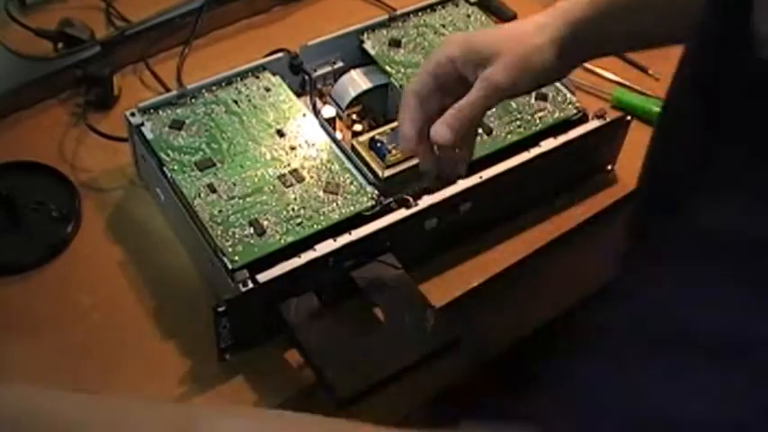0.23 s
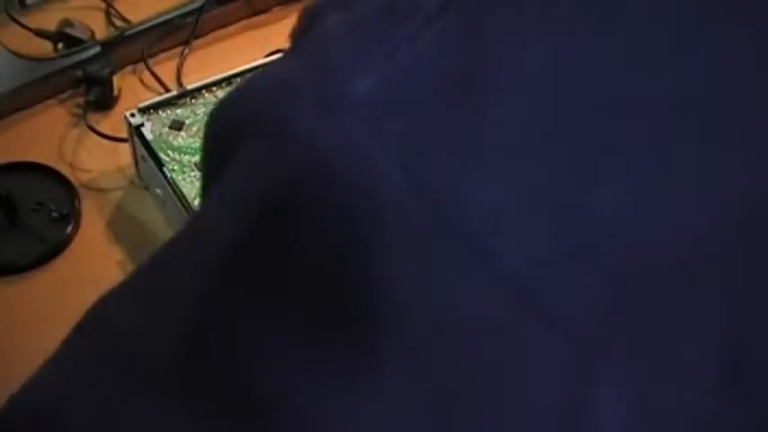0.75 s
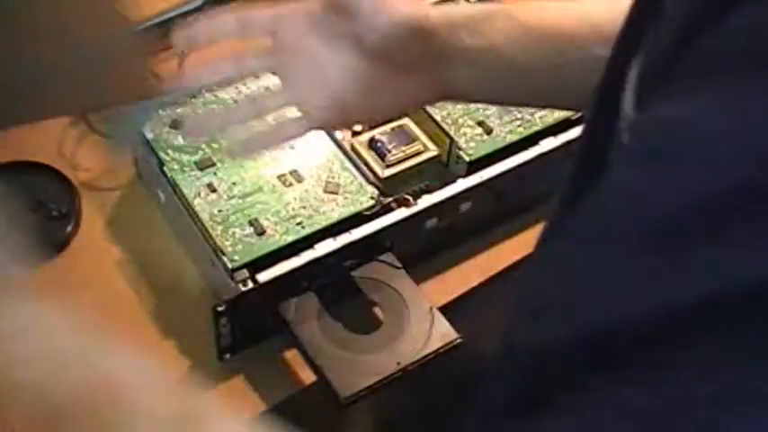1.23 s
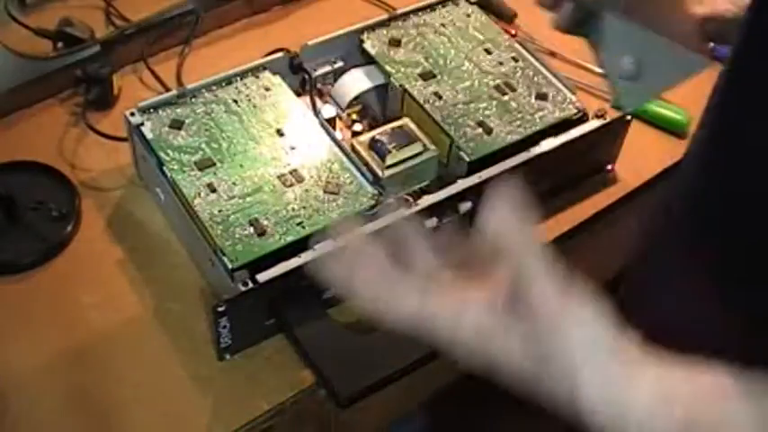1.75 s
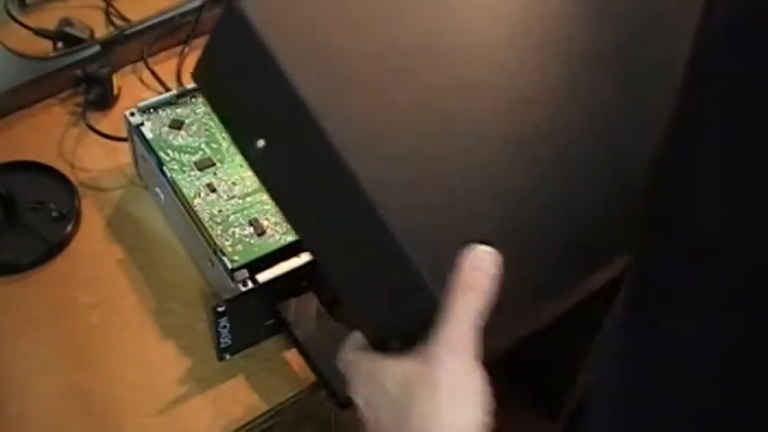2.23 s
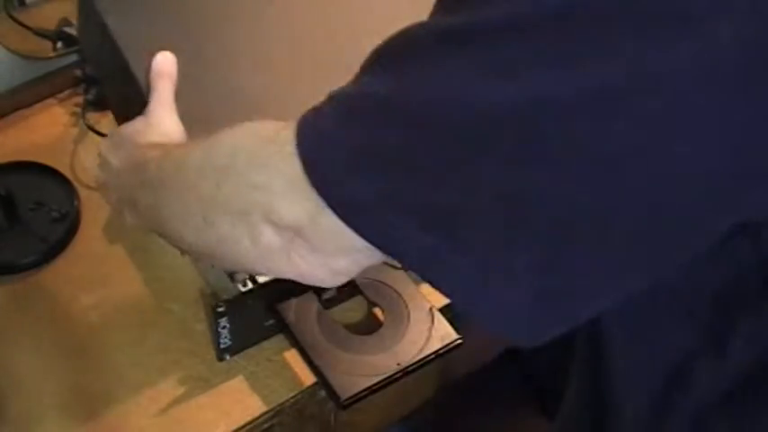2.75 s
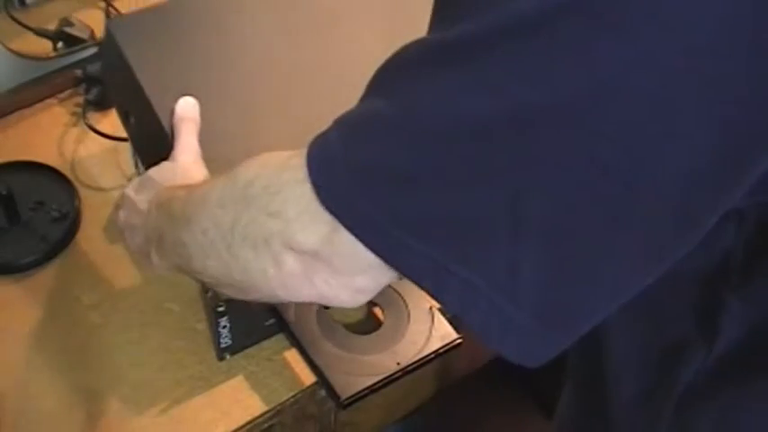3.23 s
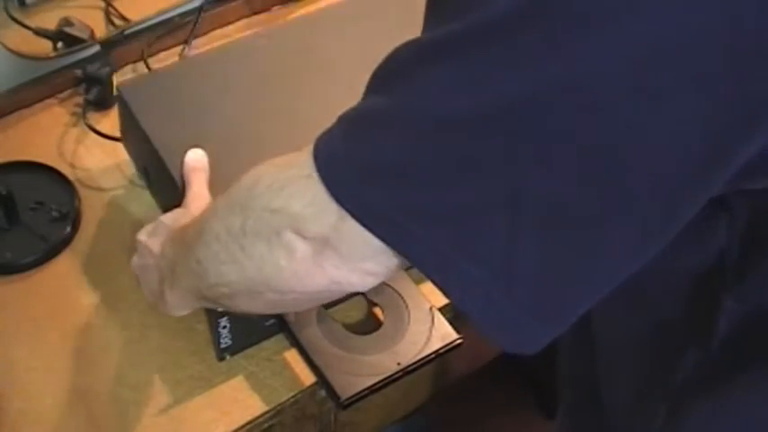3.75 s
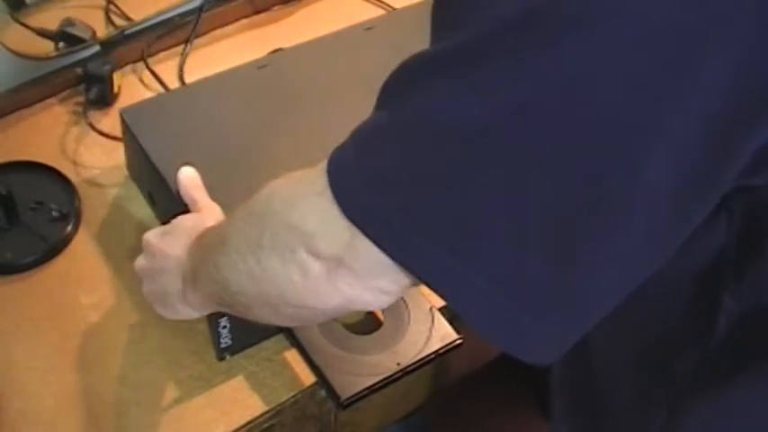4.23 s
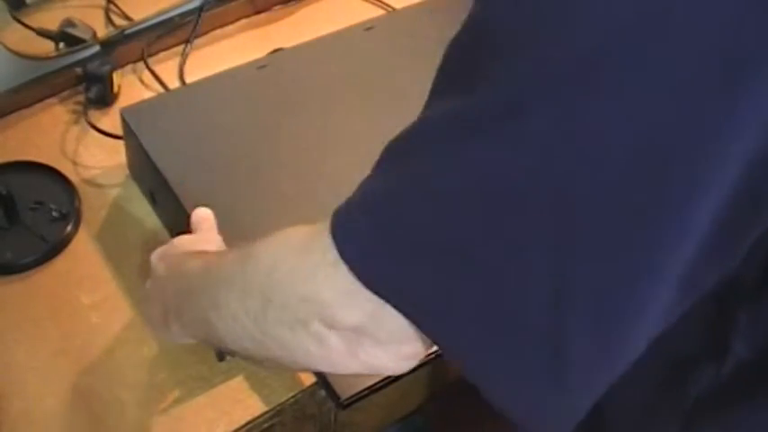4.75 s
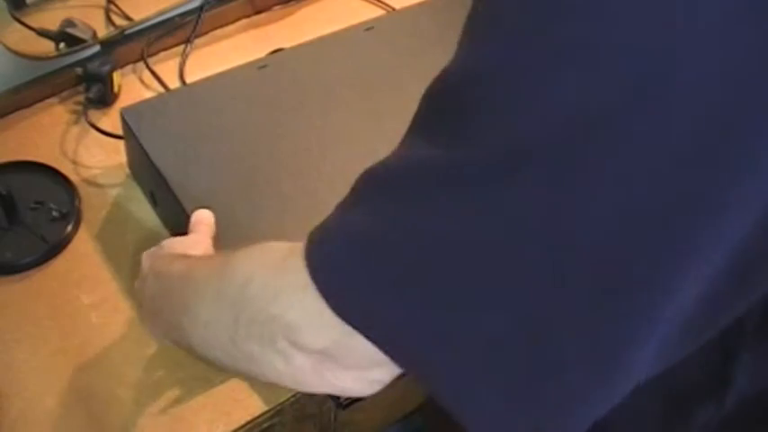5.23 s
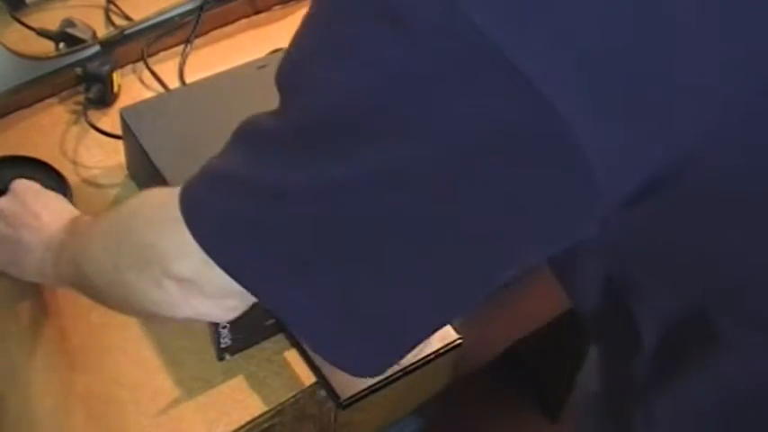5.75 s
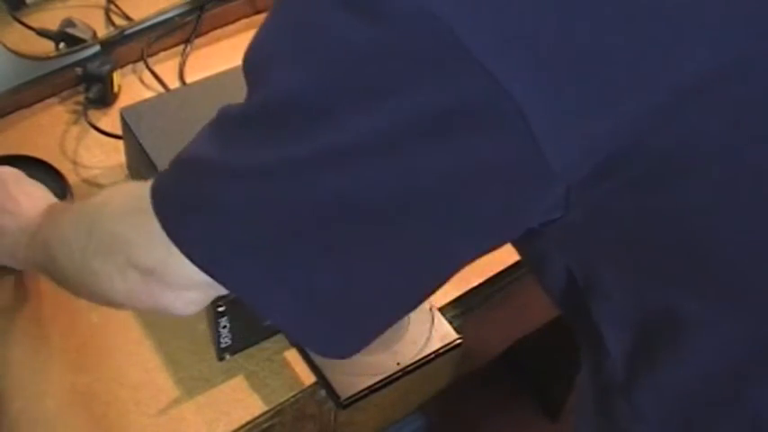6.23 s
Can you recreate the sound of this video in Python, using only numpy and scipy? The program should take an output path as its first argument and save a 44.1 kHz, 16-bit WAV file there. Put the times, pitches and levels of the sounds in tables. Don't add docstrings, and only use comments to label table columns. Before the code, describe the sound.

Soft bumps and faint rubbing, a sudden metallic scrape, then loud clattering as a metal casing seats, followed by light screw ticks and hiss.

```python
import sys
import numpy as np
from scipy import signal
from scipy.fft import rfft, irfft
from scipy.io import wavfile

SR = 44100
rng = np.random.default_rng(int(sys.argv[2]) if len(sys.argv) > 2 else 0)


def invert_db(x):
    u = np.asarray(x, float) / 20
    return 10 ** u


def to_wav(sig):
    pcm = np.clip(np.atleast_2d(sig), -1, 1) * 32767
    pcm = np.round(pcm).astype(np.int16)
    wavfile.write(sys.argv[1], SR, pcm.T)


N = 286650

# low_hz, high_hz
BANDS = [
    (60, 800),
    (800, 2500),
    (2500, 5200),
    (5200, 16000),
]
# pitch_hz, level_db, t60_s
LIFTED = [(373, -3.5, 0.16), (404, -7, 0.18), (437, -10, 0.53), (578, 0.5, 0.17), (960, -11, 0.21)]
IN_HAND = [(459, 7, 0.086), (487, 1, 0.23), (688, -10, 0.48), (825, -21, 0.18), (1090, -10.5, 0.12),
           (1274, 2, 0.35), (1420, -2.5, 0.12), (1566, -4, 0.13), (2140, -16, 0.17), (2770, -14, 0.26),
           (3650, -11, 0.068), (3840, -15, .2)]
LOWERED = [(501, -1.5, 0.6), (1270, -2, 0.31), (1390, 0, 0.18), (1892, 2.5, 0.3), (1986, 7, .4),
           (2094, 10.5, .25), (4310, -6, .2), (4330, -15.5, .14), (2970, -3, 0.14), (3740, -6.5, .2),
           (3850, -18, .2), (3960, 0.5, .2)]
SEATED = [(278, -2, 0.33), (360, -9.5, 0.22), (484, 5, 0.27), (575, 1.5, 0.14), (737, 1.5, 0.25),
          (880, 4, 0.26), (1370, -16, .2), (1230, -2, 0.17), (1504, 1, 0.34), (1850, -15.5, 0.17),
          (2060, -17, .16), (2260, -2, .2), (2770, -9, .15), (2920, -9, .15)]
DISH = [(880, -6, 0.13), (937, 4, 0.2), (1122, 3, 0.24), (1180, -9, .2), (1410, 6, .15), (1750, 7.5, .15),
        (1950, 3, 0.19), (2177, 4.5, 0.13)]
DRAGGED = [(1090, 3, .05), (1370, 6, .06), (1250, 2, .04), (1850, 0, .04), (2170, 6, .045), (2260, 3, .045),
           (2850, -5, .04)]
TILTED = [(301.5, -0.5, 0.41), (389.5, 0, 0.3), (417, -1, 0.22), (569, 2.5, 0.28), (694, -7.5, 0.16),
          (895, -18, .15), (1120, -17, .2), (1270, -3.5, 0.35)]
PRESSED = [(275, -1, 0.2), (433, -8, 0.16), (489, -3.5, 0.22), (554, -2, 0.21), (603, -8, 0.15),
           (682, -11, 0.16), (751, 1.5, 0.094), (871, 4.5, 0.08)]
SLIDING = [(304, -3, 0.18), (491, 6.5, 0.2), (4080, -3, 0.15), (720, -1, 0.15), (884, 4, 0.16),
           (1436, -3, 0.07), (1870, 0, 0.24), (2284, 5, 0.088), (2700, -11, 0.1), (2960, 1, .08),
           (3790, -4, 0.066)]
# start_s, end_s, modes, clear_over_dense_db, dense_t60_s at 1 kHz, ring_share left by the hands
HOLDS = [(0, 1.198, LIFTED, -10.5, 0.044, 0.71), (1.196, 1.809, DRAGGED, -4, 0.13, 1),
         (1.82, 1.941, DRAGGED, -16, 0.34, .3), (1.918, 2.01, IN_HAND, 4, 0.31, 0.12),
         (2.024, 2.196, IN_HAND, 8.5, 0.32, 0.56), (2.18, 2.67, IN_HAND, -8.5, 0.3, 0.18),
         (2.671, 3.582, TILTED, -4.5, 0.27, 1), (3.576, 3.695, IN_HAND, 2, 0.14, 0.41),
         (3.683, 3.845, LOWERED, -2, 0.23, 0.65), (3.853, 4.098, SLIDING, -7, 0.1, 0.99),
         (4.099, 4.663, SEATED, -5.5, 0.17, 0.62), (4.67, 5.55, PRESSED, -7.5, 0.09, 0.8),
         (5.557, 6.503, DISH, -5.5, 0.16, 0.2)]
# rub_boom_db, edge_db
GRIP = [(5.5, 0.5), (-26, 0.5), (-16, 5), (-2.5, 0), (-17, -8.5), (-21, 0.5), (3, -2), (7, -7), (-0.5, 6.5),
        (-1.5, 5.5), (2.5, 2), (5.5, 4.5), (-24, -4)]
# freq_hz, level_db per Hz
METAL_TONE = [(35, -75), (60, -33.5), (268, -7.5), (437, -6.5), (492, 0.5), (651, -6.5), (862, -6),
              (968, -8.5), (1220, -5), (1740, -8), (2900, -12.5), (5330, -20), (8510, -10), (13600, -30),
              (16000, -49)]
MODE_WANDER = 0.0035

# peak_s, level_db, build_s, let_go_s, sharpness_db
HANDLING_RUBS = [(0.09, -86, .03, 0.087, 32), (0.496, -61.5, 0.037, 0.066, 5),
                 (0.511, -43.5, 0.0092, 0.42, -10), (0.69, -68.5, 0.23, 0.19, 14),
                 (1.36, -66, 0.25, 0.21, 6), (1.485, -42, 0.12, 0.17, -8.5), (1.53, -64, 0.066, 0.36, 18),
                 (1.623, -41, 0.05, 0.2, 0), (1.882, -62, 0.26, 0.17, -24),
                 (1.946, -39.5, 0.016, 0.26, -4.5), (2.065, -23, 0.033, 0.12, -16.5),
                 (2.2, -52, 0.31, 1, -1.5), (2.35, -43.5, 0.18, 0.15, 8.5), (2.467, -55.5, 0.13, 0.1, -6),
                 (2.785, -51, 0.014, 0.088, -22), (3.089, -50.5, 0.14, 0.12, -1),
                 (3.224, -58.5, 0.086, 0.092, -3.5), (3.307, -56.5, 0.0052, 0.21, -2),
                 (3.508, -51, 0.034, 0.34, -8.5), (3.68, -56.5, 0.11, 0.044, -1)]
# peak_s, level_db, build_s, let_go_s, sharpness_db
SEATING_RUBS = [(3.718, -26.5, 0.033, 0.2, -5.5), (3.859, -38, 0.0045, 0.4, 3.5),
                (3.912, -30, 0.11, 0.3, -6), (4.018, -36.5, 0.19, 0.054, -5),
                (4.192, -26.5, 0.08, 0.34, -6.5), (4.258, -23.5, 0.074, 0.16, -9.5),
                (4.59, -61, 0.24, 0.17, 7.5), (4.752, -31.5, 0.021, 0.19, -3.5),
                (4.842, -38.5, 0.091, 0.19, -17), (5.054, -40.5, 0.04, 0.23, -16),
                (5.279, -59.5, 0.039, 0.27, 9), (5.624, -49.5, 0.0065, 0.05, 4),
                (5.698, -33, 0.033, 0.3, -3), (5.781, -38, 0.13, 0.24, -25),
                (5.9, -57.5, 0.028, 0.98, -1.5), (6.124, -49, 0.0066, 0.59, -4.5),
                (6.24, -40.5, 0.064, 0.16, -2.5), (6.39, -52.5, 0.062, 1, 0), (6.49, -49.5, 0.065, 0.33, 1)]
SWELL_DB = 30
BUILD_SHAPE = 1.76
LET_GO_STRETCH = [0.82, 0.86, 0.72, 0.56]
RESTING_DB = [-76, -76, -75, -76]
# start_s, level_db, weight_db, sharpness_db, t60_s
HANDLING_KNOCKS = [(0.507, -44, -14, -17, 0.026), (.549, -47, 5, -2, 0.052),
                   (0.563, -36.5, 15.5, -13, 0.057), (0.574, -37, 21.5, -16, 0.042),
                   (.622, -40, 16, -12, 0.041), (0.647, -51, 17, -8, 0.037), (0.658, -53.5, -7, 5, 0.42),
                   (1.406, -54, 5, 5.5, 0.18), (1.61, -46.5, -30, 10, 0.071),
                   (1.729, -46.5, -28, -9, 0.096), (1.941, -34.5, -12, -8, 0.15),
                   (2.052, -26.5, -7.5, -16, 0.2), (2.063, -22.5, -1, -11, 0.049),
                   (2.28, -45.5, 3, 12.5, 0.13), (2.434, -38, 2.5, -8.5, 0.083),
                   (2.785, -45, 5.5, -3.5, 0.12), (2.963, -52, 7.5, -0.5, 0.18),
                   (3.072, -44.5, 3, -21, 0.17), (3.303, -45.5, 29, 4, 0.032),
                   (3.506, -47.5, 12, -3, 0.094), (3.528, -49.5, 16, -8, 0.11),
                   (3.581, -40, -7, -9.5, 0.17)]
# start_s, level_db, weight_db, sharpness_db, t60_s
SEATING_KNOCKS = [(3.693, -20, -20, 1.5, 0.11), (3.712, -17, 12, -14, 0.053),
                  (3.851, -31.5, 20, 5.5, 0.036), (3.881, -26, -3, 1, 0.17), (4.126, -29, 2, 0.5, 0.068),
                  (4.161, -19, 6.5, 5.5, 0.091), (4.193, -30.5, 23.5, -20, 0.087), (4.219, -31, -3, 6, .06),
                  (4.262, -33, -7, -16, 0.054), (3.934, -39, 20, -17, 0.06), (4.233, -15.5, 8, -0.5, 0.093),
                  (4.739, -35, -12, 12, 0.042), (4.743, -25.5, -16, -12, 0.065),
                  (4.757, -26, -5, -4, 0.044), (4.832, -25, 3, -10, 0.035), (5.029, -31.5, 16, -8, 0.036),
                  (5.049, -30, 13, -2.5, 0.09), (5.689, -36, -7, -25, 0.087), (6.152, -37, -32, -11, 0.09),
                  (6.206, -39, -43, -19, 0.21), (6.386, -56, 9.5, 15, 0.14)]
EDGE_SHARE, KNOCK_EDGE_DB = 0.43, -3.5
DISH_FROM_S, DISH_TOP_HZ = 5.55, 9000

# start_s, peak_db, low_hz, high_hz
CRACKS = [(.0757, -50, 1500, 11000), (3.585, -40.5, 900, 5000), (5.975, -49, 900, 5000),
          (.659, -37, 6000, 10000), (.7, -40, 6000, 10000), (1.73, -44, 5500, 7460),
          (2.788, -43, 600, 6000), (2.966, -50, 1000, 8000), (3.502, -51, 700, 5950),
          (3.6935, -19, 2000, 10100), (3.706, -10, 1200, 5000), (3.853, -25, 2500, 9900),
          (4.127, -25, 4000, 10000), (4.163, -29, 4000, 10000), (4.197, -16, 497, 2000),
          (4.2195, -19, 2500, 10000), (4.2366, -14, 1500, 10000), (4.2505, -13.5, 600, 3000),
          (4.273, -12, 696, 2980), (4.746, -24, 900, 4950), (5.048, -21, 5000, 11000),
          (5.058, -25, 800, 3940), (6.1205, -33.5, 1100, 3000), (6.133, -41, 1400, 3200),
          (6.1525, -36, 800, 2600), (6.158, -35, 900, 2590), (6.2175, -32, 900, 2620),
          (6.2235, -34, 900, 2600), (6.237, -29, 900, 2610), (6.389, -34, 4000, 10100)]
# start_s, peak_db, low_hz, high_hz
CHATTER = [(6.211, -31, 3500, 7000), (6.2177, -31, 3800, 10000), (6.2238, -28, 3800, 10000),
           (6.233, -34, 4000, 6000), (6.237, -31, 3800, 10000), (6.2475, -32, 3800, 9000),
           (6.254, -28.5, 3800, 9000), (6.26, -44, 3000, 8000), (6.27, -46, 4000, 9000),
           (6.3, -41, 3000, 9000)]
CRACK_T60_S = 0.0068
# start_s, peak_db, pitch_hz, t60_s
TICKS = [(0.076, -64, 4980, 0.015), (0.082, -49, 8040, 0.024), (0.101, -46, 8500, 0.024),
         (1.528, -38, 7700, .01), (1.546, -38, 7500, .012), (1.729, -51, 1890, 0.065),
         (1.882, -56, 5000, .01), (4.834, -29.5, 3900, 0.014), (5.264, -59, 8300, .02),
         (6.475, -40, 4300, .02), (1.837, -44, 1520, 0.023), (2.432, -35, 960, 0.048),
         (2.966, -62, 1510, 0.018), (3.584, -40, 1270, 0.14), (3.854, -28, 3770, .015),
         (3.694, -20.5, 2830, 0.018), (.51, -36, 1710, .02), (5.623, -33, 900, 0.0098),
         (5.773, -29, 1270, 0.054), (5.904, -42, 1046, 0.13), (5.974, -41, 1470, 0.032),
         (6.12, -43, 894, 0.11), (6.215, -42, 880, 0.22), (6.243, -37, 885, 0.1), (5.029, -36, 2040, 0.011),
         (6.135, -43, 1300, 0.016), (6.152, -40.5, 1003, 0.13), (6.39, -50, 4970, 0.016)]
# start_s, length_s, level_db, pitch_hz
SQUEAK = (1.838, .05, -60, 1870)
# start_s, peak_db, pitch_hz, t60_s
THUMPS = [(0.514, -24, 416.4, 0.13), (.548, -23, 399, 0.16), (.59, -27.5, 451, 0.12),
          (3.304, -37, 379, 0.32), (4.039, -44.5, 257, .4), (0.614, -28.5, 434, 0.11),
          (1.934, -37, 247, 0.15), (2.791, -40, 300, 0.35), (2.801, -49.5, 195, 0.3),
          (3.881, -19, 299, 0.086), (4.821, -26, 275, 0.28), (5.065, -31.5, 429.6, 0.4),
          (5.623, -39, 230, .07), (5.646, -37, 198, .05), (5.72, -48, 200, .08), (5.766, -45, 224, 0.084),
          (5.809, -46, 202, 0.065), (5.844, -53, 190, .08), (6.162, -46, 200, .05), (6.245, -43, 220, .06),
          (6.33, -49, 188, .08), (6.399, -56, 200, .1), (6.47, -46, 180, .08), (6.184, -43, 190, .05),
          (6.222, -45, 198, 0.086), (6.264, -43, 181, .05), (6.287, -43, 258, .05)]

ROOM_T60_S, ROOM_DB = 0.18, -11
# freq_hz, level_db against the middle
WIDTH = [(60, -10), (200, -25.5), (400, -19), (1300, -14.5), (2400, -13.5), (4400, -13), (8000, -11.5),
         (10500, -2.5), (12000, -13), (15000, -19)]
MIC_LOW_CUT_HZ = 164
# freq_hz, level_db
HISS = [(15, -71), (25, -21), (70, -23), (97, -18), (130, -11), (270, -2.5), (309, -2.5), (734, -3.5),
        (962, -3), (1070, -3.5), (1560, -6.5), (3340, -12), (6560, -19), (8140, -15), (16000, -29.5)]
HISS_DB = -66.5
# freq_hz, likeness (-1 to 1)
HISS_LIKENESS = [(60, -0.46), (180, -0.54), (550, -0.64), (1650, -0.44), (4970, -0.21), (15000, -0.16)]
# pitch_hz, rms_db
WHINE = [(726.7, -81), (1093, -77.5), (1459, -81.5), (8070, -81), (8452, -99.5), (10691, -87.5),
         (15628, -101)]
# centre_hz, width_hz, level_db, flutter_db
CHIRR = [
    (7820, 900, -78.5, 2),
    (11000, 90, -84, 0.5),
    (15628, 54, -86.5, -2),
    (94.6, 11, -86.5, 0.5),
]
# start_s, peak_db
DRIVE_CLICKS = [(0.8676, -56), (0.9035, -53), (0.9604, -63), (0.9948, -53), (1.0487, -66), (1.0702, -57),
                (1.0976, -51), (1.165, -61), (1.2109, -62), (1.352, -55), (1.4014, -53),
                (2.5977, -67), (2.7467, -60), (2.7743, -53),
                (5.1412, -48), (5.2235, -59), (5.2645, -53), (5.2762, -46), (5.3423, -45), (5.4221, -50),
              (5.5019, -58), (5.5967, -56)]
# low_hz, high_hz
DRIVE_HZ = (7600, 8800)
DRIVE_T60_S = 0.04


def unit(x):
    return x / np.sqrt(np.sum(x ** 2) + 1e-20)


def band_pass(x, order, low_hz, high_hz):
    sos = signal.butter(order, [low_hz, high_hz], "band", fs=SR, output="sos")
    return signal.sosfilt(sos, x)


def at_hz(points, hz):
    p = np.array(points)
    return np.interp(np.log(np.maximum(hz, 1)), np.log(p[:, 0]), p[:, 1])


def colour(x, spectrum):
    hz = np.fft.rfftfreq(x.shape[-1], 1 / SR)
    return irfft(rfft(x) * invert_db(at_hz(spectrum, hz)), x.shape[-1])


def minimum_phase(spectrum, size):
    log_gain = at_hz(spectrum, np.fft.rfftfreq(size, 1 / SR)) * np.log(10) / 20
    cepstrum = irfft(log_gain, size)
    cepstrum[1:size // 2] *= 2
    cepstrum[size // 2 + 1:] = 0
    return irfft(np.exp(rfft(cepstrum)), size)


def drift(rate_hz):
    r = np.exp(-2 * np.pi * rate_hz / SR)
    slow = signal.lfilter([1], [1, -2 * r, r * r], rng.standard_normal(N + SR))[SR:]
    return slow / slow.std()


def dying_noise(t60_1k, tilt, seconds):
    t = np.arange(int(seconds * SR)) / SR
    out = 0
    for low in 60 * 2. ** np.arange(8):
        band = band_pass(rng.standard_normal(len(t)), 2, low, 2 * low)
        t60 = t60_1k * (1000 / (low * np.sqrt(2))) ** tilt
        out = out + band * invert_db(-60 * t / t60) / np.sqrt(t60)
    return out


def bursts(rows, t60):
    out, t = np.zeros(N), np.arange(SR // 20) / SR
    for s, db, low_hz, high_hz in rows:
        noise = rng.standard_normal(len(t))
        burst = band_pass(noise * invert_db(-60 * t / t60), 3, low_hz, high_hz)
        i = round(s * SR)
        out[i:i + len(t)] += (invert_db(db) * burst / np.abs(burst).max())[:N - i]
    return out


def flutter(hz, width, db, depth_db):
    band = band_pass(rng.standard_normal((2, N)), 2, hz - width / 2, hz + width / 2)
    waver = np.minimum(drift(7.3) + 0.63 * drift(50), 2)
    return invert_db(db + depth_db * waver) * band / band.std()


def camera():
    hz = np.fft.rfftfreq(N, 1 / SR)
    alike = np.clip(at_hz(HISS_LIKENESS, hz), -1, 1)
    mid, side = rfft(colour(rng.standard_normal((2, N)), HISS))
    side = np.sqrt((1 - alike) / (0.8 + alike)) * side
    hiss = irfft(mid + side * [[1], [-1]], N)
    hiss = invert_db(HISS_DB) * hiss / hiss.mean(axis=0).std()
    t = np.arange(N) / SR
    whine = sum(invert_db(db) * np.sqrt(2) * np.sin(2 * np.pi * (f * t + rng.random())) for f, db in WHINE)
    return hiss + sum(flutter(*row) for row in CHIRR) + whine


def drive():
    clicks = DRIVE_CLICKS
    rows = [(s, db + 1.5, *DRIVE_HZ) for s, db in clicks]
    return np.array([bursts(rows, DRIVE_T60_S) for _ in range(2)])


def room_tail():
    return np.r_[np.zeros(round(.004 * SR)), unit(dying_noise(ROOM_T60_S, tilt=.15, seconds=.7))]


def room(x):
    mid, side = invert_db(ROOM_DB) * room_tail(), invert_db(ROOM_DB) * room_tail()
    near = np.r_[np.zeros(SR // 500), unit(dying_noise(.12, tilt=.1, seconds=.2))]
    side[:len(near)] += near
    side = signal.fftconvolve(side, minimum_phase(WIDTH, size=1024))
    wet_mid = signal.fftconvolve(x, mid)[:N]
    wet_side = signal.fftconvolve(x, side)[:N]
    return x + wet_mid + wet_side * [[1], [-1]]


def low_thumps():
    out, t = np.zeros(N), np.arange(SR // 3) / SR
    for s, db, hz, t60 in THUMPS:
        i = round(s * SR)
        modes = np.sin(2 * np.pi * hz * t) + 0.23 * np.sin(2 * np.pi * .72 * hz * t)
        swell = 1 - np.exp(-t / 0.0018)
        thump = invert_db(db - 6.0 - 60 * t / max(t60, .05)) * swell * modes
        out[i:i + len(t)] += thump[:N - i]
    return out


def squeak():
    out, t = np.zeros(N), np.arange(SR // 8) / SR
    s, length, db, hz = SQUEAK
    wobble = np.cumsum(1 + 0.0053 * drift(60)[:len(t)]) / SR
    fade = np.exp(-np.maximum(t - length, 0) / 0.012)
    level = invert_db(db + 4.8 * drift(80)[:len(t)])
    out[round(s * SR):][:len(t)] += level * fade * np.sin(2 * np.pi * hz * wobble)
    return out


def ticks():
    out, t = np.zeros(N), np.arange(SR // 8) / SR
    for s, db, hz, t60 in TICKS:
        i = round(s * SR)
        noise = rng.standard_normal(len(t)) * invert_db(-60 * t / 0.0087)
        crack = band_pass(noise, 2, hz * .7, min(hz * 3.0, 11000))
        ring = invert_db(2.5 - 60 * t / max(t60, .003)) * np.sin(2 * np.pi * hz * t)
        out[i:i + len(t)] += (invert_db(db - 6.0) * (crack / np.abs(crack).max() + ring))[:N - i]
    return out


def metal_response(modes, clear_db, t60, ring_share):
    dense = unit(dying_noise(t60, tilt=0.55, seconds=.3))
    dense[0] += 1.2
    dense = signal.fftconvolve(dense, minimum_phase(METAL_TONE, size=4096))[:len(dense)]
    t = np.arange(len(dense)) / SR
    reach_db = 2 * rng.standard_normal(len(modes))
    detune = 1 + MODE_WANDER * rng.standard_normal(len(modes))
    clear = np.zeros(len(t))
    for (hz, db, ring), reach, shift in zip(modes, reach_db, detune):
        held_t60 = min(ring_share, 1) * min(ring, 12 / np.sqrt(hz))
        clear += invert_db(db + reach - 60 * t / held_t60) * np.sin(2 * np.pi * hz * shift * t)
    whole = unit(dense) + invert_db(clear_db) * unit(clear)
    bands = [unit(band_pass(whole, 2, *edges)) for edges in BANDS]
    return np.array(bands) * [[1], [-1], [1], [-1]]


def slips(per_s, spread_db):
    size = invert_db(spread_db * np.minimum(rng.exponential(1, N), 3)) * rng.choice([-1, 1], N)
    return unit(size * (rng.random(N) < per_s / SR)) * np.sqrt(N)


def grip_at(s):
    return GRIP[np.searchsorted([hold[0] for hold in HOLDS], s) - 1]


def rubbing():
    t = np.arange(N) / SR
    power = invert_db(np.array(RESTING_DB))[:, None] ** 2 * np.ones(N)
    for s, db, build, let_go, sharp in HANDLING_RUBS + SEATING_RUBS:
        boom, edge = grip_at(s)
        span = slice(max(round((s - 2 * build) * SR), 0), round((s + 2 * let_go) * SR))
        before = np.maximum((s - t[span]) / max(build, .002), 0) ** BUILD_SHAPE
        after = (t[span] - s) / (max(let_go, .01) * np.c_[LET_GO_STRETCH])
        tone_db = np.c_[[boom, 0, edge + EDGE_SHARE * sharp, sharp]]
        power[:, span] += invert_db(db - 4.5 + tone_db - SWELL_DB * np.maximum(before, after)) ** 2
    return np.sqrt(power)


def rattling():
    out = np.zeros((4, N))
    rise_s = np.array([[.006], [.002], [.001], [.0005]])
    for s, db, weight, sharp, t60 in HANDLING_KNOCKS + SEATING_KNOCKS:
        i = round(s * SR)
        edge = grip_at(s)[1] + KNOCK_EDGE_DB
        after = np.arange(min(SR // 2, N - i)) / SR
        levels = invert_db(db + np.c_[[weight, 0, edge + EDGE_SHARE * sharp, sharp]])
        out[:, i:i + SR // 2] += levels * invert_db(-60 * after / max(t60, .005)) * (1 - np.exp(-after / rise_s))
    return out


def force():
    cover_grains = slips(5000, 2.84)
    screw_grains = 0.85 * slips(5000, 4.4) + 0.61 * slips(350, 1.5)
    grains = np.where(np.arange(N) / SR < DISH_FROM_S, cover_grains, screw_grains)
    rubs = rubbing() * grains * invert_db(1.33 * drift(24))
    return rubs + invert_db(-5.0) * rattling() * slips(4000, 2.47)


def metal():
    push, out = force(), np.zeros(N)
    point = np.repeat(rng.integers(0, 5, N // 160 + 1), 160)[:N]
    for start, end, *hold in HOLDS:
        a, b = round(start * SR), round(end * SR)
        for k in range(5):
            touch = push[:, a:b] * (point[a:b] == k)
            rung = signal.fftconvolve(touch, metal_response(*hold), axes=1).sum(axis=0)
            out[a:a + len(rung)] += rung[:N - a]
    return out


def scene():
    work = metal() + ticks() + squeak() + low_thumps() + bursts(CRACKS + CHATTER, CRACK_T60_S)
    dish = round(DISH_FROM_S * SR)
    work[dish:] = signal.sosfilt(signal.butter(2, DISH_TOP_HZ, fs=SR, output="sos"), work[dish:])
    work = signal.sosfilt(signal.butter(3, MIC_LOW_CUT_HZ, "high", fs=SR, output="sos"), work)
    balance = invert_db(np.array([[-.2], [.2]]))
    return room(work) * balance + camera() + drive()


def top_cut(x):
    return signal.sosfilt(signal.butter(12, 15850, fs=SR, output="sos"), x)


def record(dry):
    return top_cut(dry)


dry = scene()
out = record(dry)
to_wav(out)
```